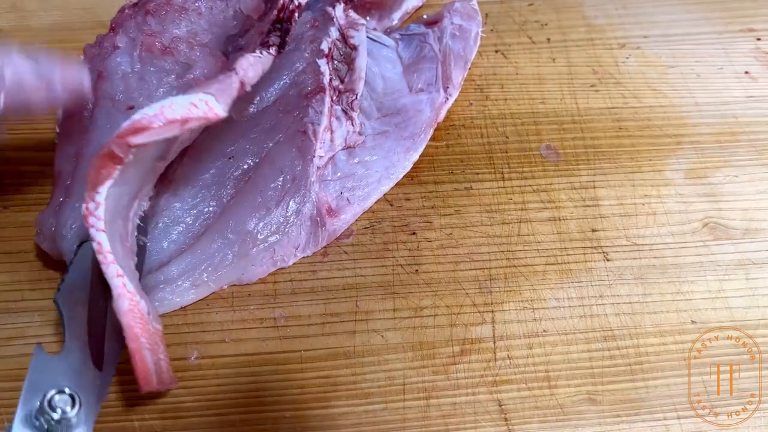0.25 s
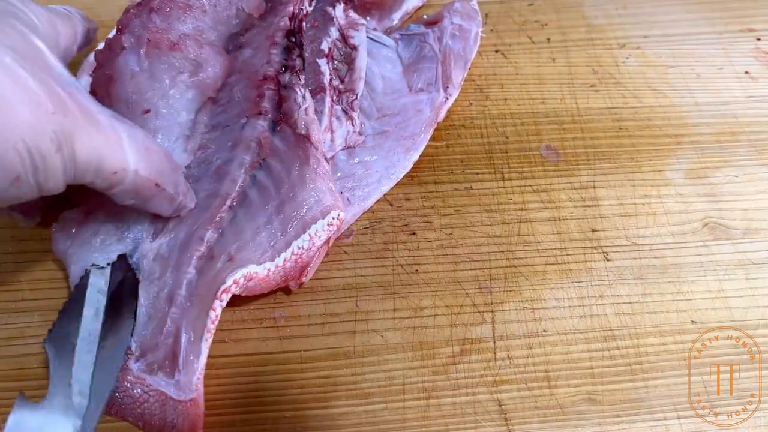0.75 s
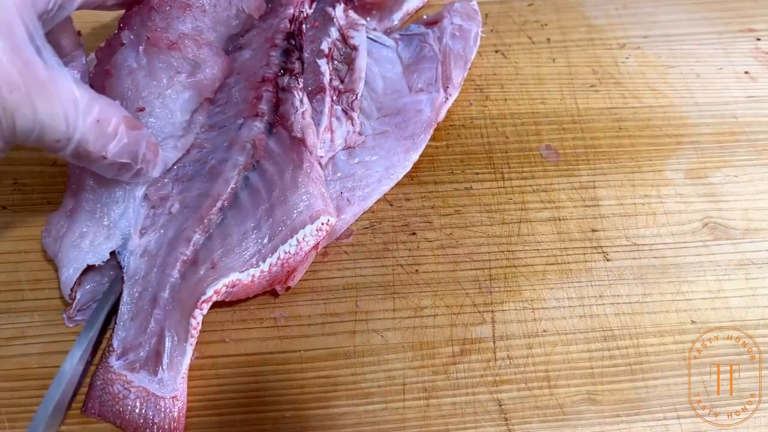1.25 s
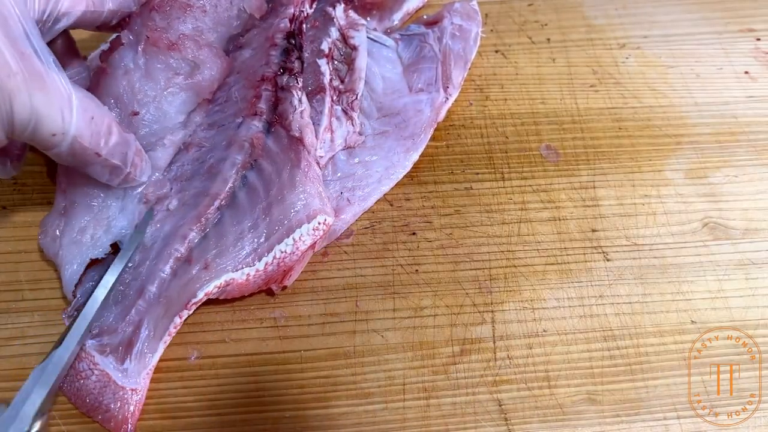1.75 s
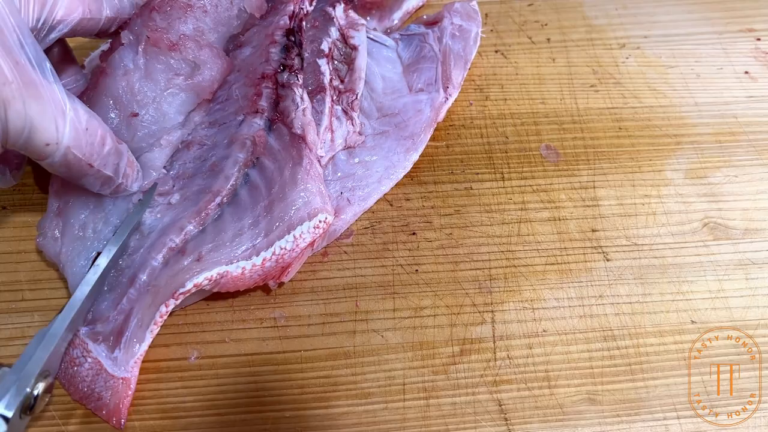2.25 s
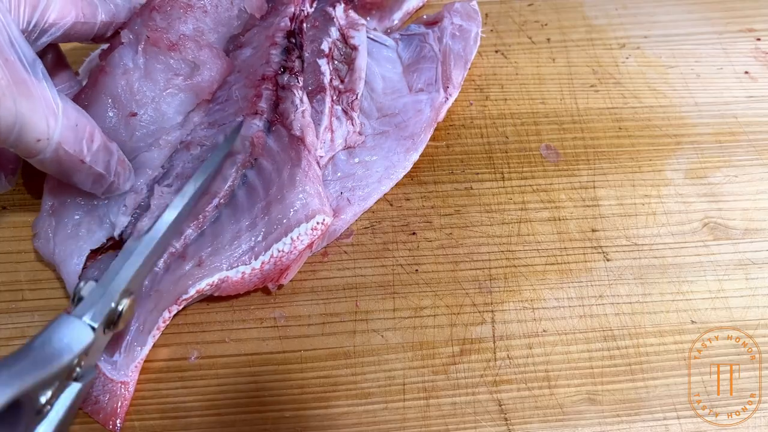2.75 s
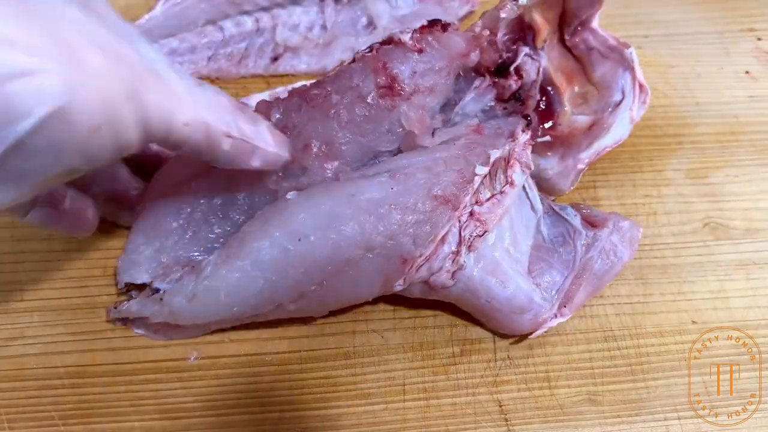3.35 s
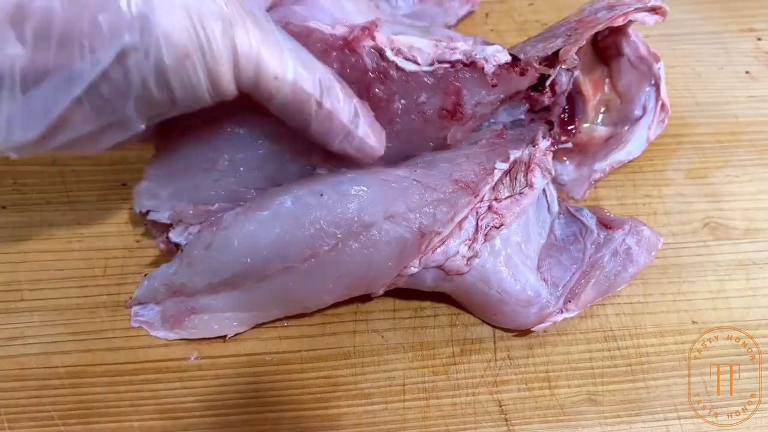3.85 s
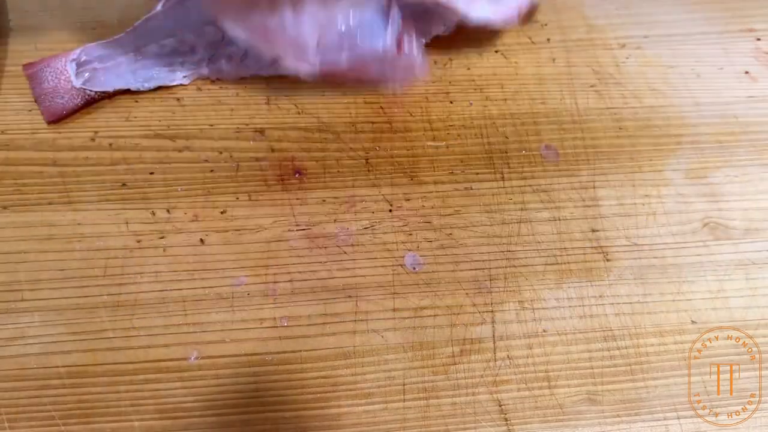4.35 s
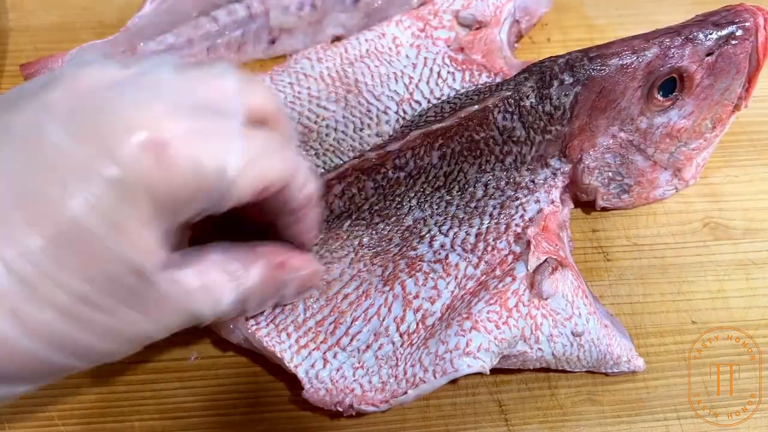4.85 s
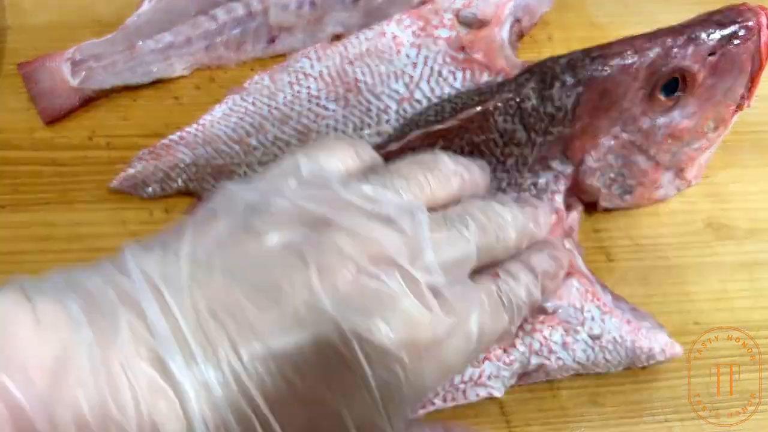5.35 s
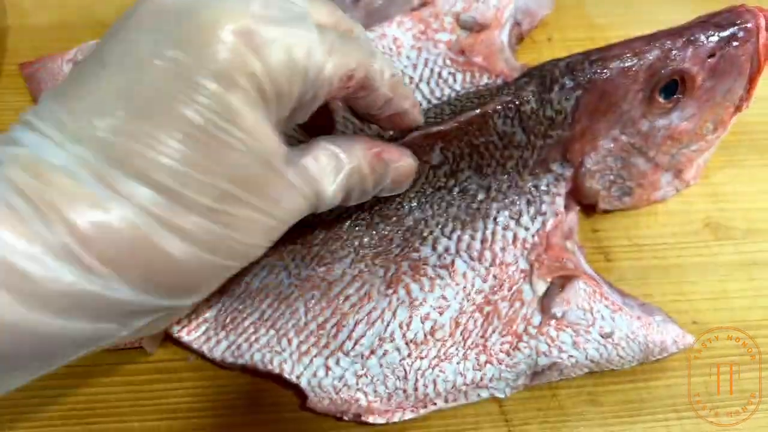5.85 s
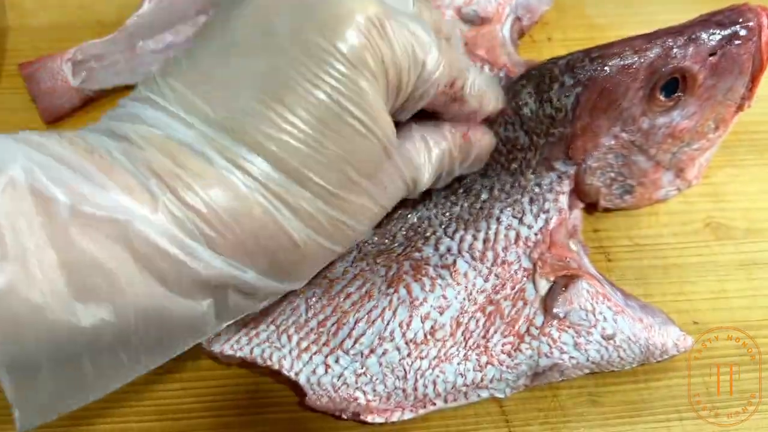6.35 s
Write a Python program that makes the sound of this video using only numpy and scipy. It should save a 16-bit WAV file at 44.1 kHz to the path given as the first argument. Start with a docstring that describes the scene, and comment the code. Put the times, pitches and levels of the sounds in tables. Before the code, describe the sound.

A wet fish flops onto a wooden board with a soft thump and a dull clink of shears. The blades rub, then snap twice through the backbone, each a sharp crack with a brief steel ring. Afterwards gloved hands peel up, turn and pat the fish, making quiet squelches, crinkles and sticky smacks. The sound is close, in a small kitchen with a faint low fan running throughout.

```python
"""Kitchen shears work along a fish on a wooden board and snap twice through its backbone.
The fish flops down, the blades rub, bone cracks and the steel rings into a small kitchen.
Then gloved hands peel the wet fish off the board, turn it and pat it: films tear, bubbles pop.
A fan rushes low throughout."""
import sys
import numpy as np
from scipy import signal
from scipy.io import wavfile
from scipy.ndimage import uniform_filter1d

SR = 44100
rng = np.random.default_rng(int(sys.argv[2]) if len(sys.argv) > 2 else 0)


def file_out(sig):
    """Save sig as 16-bit WAV at sys.argv[1]."""
    # one column per channel
    cols = np.atleast_2d(sig).T
    # limit, then scale
    lim = np.clip(cols, -1, 1)
    pcm = np.round(lim * 32767).astype(np.int16)
    wavfile.write(sys.argv[1], SR, pcm)


N = 291501

# wet skin and glove: (frequency [Hz], gain [dB])
WET_SPECTRUM = [(400, -9.5), (1000, -7.5), (2000, -5.5), (3500, 0.5), (4800, -2.5), (6700, 1), (8200, -2.5),
                (9700, -0.5), (11500, -9), (13700, -4), (15300, -6)]


def amp(db):
    return 10 ** (np.asarray(db) / 20)


def unit_rms(x):
    return x / np.sqrt(np.mean(x ** 2) + 1e-30)


def unit_energy(x):
    return x / np.sqrt(np.sum(x ** 2) + 1e-30)


def interp_log_hz(points, hz):
    knots_hz, values = np.transpose(points)
    return np.interp(np.log(hz + 1), np.log(knots_hz + 1), values)


def add(mix, start_s, sound):
    part = mix[max(round(start_s * SR), 0):][:len(sound)]
    part += sound[:len(part)]


def colour(x, spectrum, tilt_db_oct=0, size=4096):
    """Minimum-phase filter: the given spectrum, tilted about 1 kHz."""
    hz = abs(np.fft.fftfreq(size, 1 / SR))
    log_gain = np.log(amp(interp_log_hz(spectrum, hz) + tilt_db_oct * np.log2((hz + 20) / 1000)))
    taps = np.fft.ifft(np.exp(np.conj(signal.hilbert(log_gain)))).real
    return signal.oaconvolve(x, taps[:size // 2])[:len(x)]


def ring(x, hz, width_hz):
    """One damped mode driven by x; unit energy."""
    r = np.exp(-np.pi * width_hz / SR)
    return unit_energy(signal.lfilter([1, 0, -1], [1, -2 * r * np.cos(2 * np.pi * hz / SR), r * r], x))


def burst(length_s, rise=0.48, size=22050):
    """A run of tiny slips: noise that swells and dies; unit energy."""
    age = np.arange(size) / SR / length_s
    return unit_energy(rng.standard_normal(size) * age ** rise * np.exp(-2 * age))


def wander(samples):
    """Smooth random drift; unit RMS."""
    return unit_rms(uniform_filter1d(uniform_filter1d(rng.standard_normal(N), samples), samples))


def fan(level_db=-61.57, waver_rad=1.1):
    """Steady low rush with faint wavering tones."""
    # air rush: (frequency [Hz], gain [dB])
    spectrum = [(15, -59), (25, -8), (80, -3.5), (137, -4.5), (161, -6), (285, -2), (714, -12.5),
                (796, -12), (863, -11.5), (988, -14.5), (2550, -24), (3080, -27.5), (3920, -27.5),
                (4740, -35.5), (16000, -37)]
    # hum: (frequency [Hz], RMS level [dB])
    tones = [(92, -72), (208, -74.5), (285, -79), (412, -79.5), (4021, -91.5), (13598, -93.5)]
    out = amp(level_db) * unit_rms(colour(rng.standard_normal(N + 4096), spectrum)[-N:])
    for hz, db in tones:
        phase = 2 * np.pi * hz * np.arange(N) / SR + waver_rad * wander(6000)
        out += amp(db) * np.sqrt(2) * np.sin(phase)
    return out


def touch(start_s, hold_s, release_s, attack_s=0.0046):
    """Contact envelope: linear attack, hold, exponential release."""
    t = np.arange(N) / SR - start_s
    return np.clip(t / attack_s, 0, 1) * np.exp(-np.maximum(t - hold_s, 0) / release_s)


def pressure(treble=False, settling_db=-78.5):
    """Crackle envelope: presses over light handling and flesh settling by itself."""
    # (start [s], hold [s], level [dB], extra treble [dB]: high for glove creases, low for flesh)
    presses = [(0.0, 0.016, -57.5, 1), (0.198, 0.038, -55, -4), (.28, .025, -52, -1), (.45, 0.074, -66, 7),
               (.56, 0.14, -66.5, 9), (2.902, 0.024, -62.5, 1), (3.127, 0.033, -58, -3),
               (3.263, 0.025, -65, 6), (3.508, 0.1, -59, 3.5), (3.703, 0.11, -56, -2.5),
               (4.388, 0.016, -58.5, -8), (4.548, 0.25, -59.5, 0.5), (5.198, 0.19, -63.5, 6),
               (5.49, 0.19, -68, 7), (5.705, 0.023, -61, 2), (6.197, 0.013, -60, 0),
               (6.517, 0.043, -56, -8)]
    # hand on the fish: (start [s], hold [s], level [dB])
    holds = [(0.0, 0.76, -69), (2.876, 1.015, -64.5), (4.47, 1.41, -69), (6.03, .55, -71.5)]
    press_power = sum((amp(db + treble * treble_db) * touch(start_s, hold_s, release_s=0.033)) ** 2
                      for start_s, hold_s, db, treble_db in presses)
    hold_power = sum((amp(db) * touch(start_s, hold_s, release_s=0.16)) ** 2
                     for start_s, hold_s, db in holds)
    return np.sqrt(press_power + hold_power + amp(settling_db) ** 2)


def squelch(pops_per_s=3000, spread_db=0.5, clump_db=5.5, fizz_db=-6, gain_db=-3.5, split_hz=9500):
    """Tiny bubbles and glove creases pop in clumps under the hand."""
    t = np.arange(256) / SR
    pops = np.zeros(N)
    pitches_hz = np.linspace(1000, 15500, 16)
    for hz in pitches_hz:
        clumps = 2 * np.tanh(wander(700) / 2)
        sizes = amp(spread_db * np.minimum(rng.exponential(1, N), 3) + clump_db * clumps)
        clicks = sizes * rng.choice([-1, 1], N) * (rng.random(N) < pops_per_s / len(pitches_hz) / SR)
        grain = np.sin(2 * np.pi * hz * t) * np.exp(-hz * t / 2.5)
        pops += unit_rms(signal.oaconvolve(clicks, grain)[:N])
    wet = colour(unit_rms(pops) + amp(fizz_db) * rng.standard_normal(N), WET_SPECTRUM)
    body = signal.sosfiltfilt(signal.butter(2, split_hz, fs=SR, output="sos"), wet)
    return amp(gain_db) * (body * pressure() + (wet - body) * pressure(treble=True)) / wet.std()


def smack(hz, click_db, tear_s=0.0059, width_ratio=0.46, overtone_ratio=1.91, overtone_db=-7):
    """A wet film tears and rings two modes of the air pocket behind it."""
    tear = unit_energy(colour(burst(tear_s, rise=1.28, size=4096), WET_SPECTRUM, tilt_db_oct=-2))
    width_hz, upper_hz = hz * width_ratio, min(hz * overtone_ratio, 15000)
    lower = ring(ring(tear, hz, width_hz), hz, width_hz)
    upper = ring(ring(tear, upper_hz, width_hz), upper_hz, width_hz)
    return unit_energy(lower + amp(overtone_db) * upper + amp(click_db) * tear)


def smacks(gain_db=17):
    """Skin or glove pulls free with a distinct smack."""
    # (time [s], relative energy [dB], pocket resonance [Hz], click re pocket [dB])
    releases = [(.017, -45.5, 3900, 10), (0.072, -45.5, 3770, 7), (.206, -45, 2540, -5),
                (.471, -50.5, 3050, 17), (.563, -45.5, 8060, -3), (.772, -52.5, 6600, 8),
                (.983, -59, 6000, 12), (3.049, -46.5, 3980, -10), (3.129, -47, 6160, 7),
                (3.269, -43.5, 4800, -3), (3.446, -48, 3850, 13), (3.514, -44.5, 4300, 4),
                (3.614, -43, 2240, 11), (3.718, -42.5, 7170, 2), (4.39, -41, 3700, 4),
                (4.470, -50, 2850, -8), (4.491, -47, 5900, 12), (4.557, -46, 4580, 16),
                (4.603, -46.5, 5900, -12), (4.665, -42, 6060, 6), (4.761, -48, 6800, -8),
                (4.791, -44, 4900, 16), (4.92, -47, 4870, -35), (5.049, -47, 6300, 5),
                (5.245, -48.5, 7300, -21), (5.278, -47, 4450, -8), (5.357, -48, 10000, -8),
                (5.43, -48.5, 5130, 14), (5.587, -43.5, 6800, 18), (5.623, -44.5, 7300, -26),
                (5.802, -48.5, 6340, 21), (5.898, -46.5, 8750, 2), (6.091, -53, 7530, -14),
                (6.311, -54.5, 7310, 8), (6.519, -43.5, 6600, 0), (6.541, -49.5, 2740, -8)]
    out = np.zeros(N)
    for time_s, db, hz, click_db in releases:
        add(out, time_s, amp(db + gain_db) * smack(hz, click_db))
    return out


def crinkles(count=130, gain_db=24, spread_db=9, low_hz=3200, high_hz=9500):
    """Small glove and skin smacks at random times, scaled by pressure."""
    out = np.zeros(N)
    for when, weakness, pitch in rng.random((count, 3)):
        hz = low_hz * (high_hz / low_hz) ** pitch
        add(out, when * N / SR, amp(gain_db - spread_db * weakness) * smack(hz, click_db=-4))
    return out * pressure()


def drag(grains_per_s=1500, clump_db=2.5):
    """Fish or blades slide over wet flesh and wood: dull grains, a bell-shaped swell per slide."""
    # (time of top speed [s], length [s], level [dB])
    slides = [(0.298, 0.31, -70), (0.764, 0.31, -69.5), (1.456, 0.21, -71.5), (3.058, 0.96, -70),
              (3.682, 0.21, -61.5), (4.18, 0.12, -70), (4.571, 0.047, -61), (4.813, 0.24, -68.5),
              (5.354, 0.28, -70), (6.05, 0.31, -68), (6.56, 0.13, -75)]
    # wet friction: (frequency [Hz], gain [dB])
    spectrum = [(300, -24), (900, 2.5), (1300, 0.5), (1650, 4.5), (2000, -3.5), (2500, 2.5), (2900, -10.5),
                (4000, -6.5), (9000, -33.5)]
    t = np.arange(N) / SR
    power = sum(amp(db) ** 2 * np.exp(-(2 * (t - time_s) / length_s) ** 2)
                for time_s, length_s, db in slides)
    grains = rng.standard_normal(N) * (rng.random(N) < grains_per_s / SR) * amp(clump_db * wander(600))
    return np.sqrt(power) * unit_rms(colour(grains, spectrum))


def thumps(lowpass_hz=1500):
    """Soft flesh lands on the board and drives its modes."""
    # (frequency [Hz], level [dB], t60 [s])
    board_modes = [(59, -2.5, .16), (110.5, 3.5, .16), (209.3, 4.5, 0.17), (290, -4.5, 0.15),
                   (398, 8, 0.061), (534, 0, 0.046), (679, -5, 0.065), (740, -5.5, .09), (896, -13.5, 0.13),
                   (1340, -13, 0.13), (1662, -8.5, 0.096)]
    # (time [s], energy before low-pass [dB], contact [s], tilt [dB/oct])
    blows = [(0.278, -16.5, 0.036, 2), (0.305, -15, 0.016, 4), (0.318, -10.5, 0.0071, 1),
             (0.34, -27, 0.0048, -15), (1.938, -24, .012, -2.5), (2.232, -25.5, 0.017, 1.5),
             (2.425, -23, 0.017, -5.5), (2.458, -30.5, 0.017, -10.5), (2.626, -29.5, 0.016, 0)]
    out = np.zeros(N)
    for time_s, db, contact_s, tilt_db_oct in blows:
        wood = 0
        for hz, mode_db, t60_s in board_modes:
            width_hz = np.log(1000) / np.pi / t60_s
            wood += amp(mode_db + tilt_db_oct * np.log2(hz / 300)) * ring(burst(contact_s), hz, width_hz)
        add(out, time_s, amp(db) * unit_energy(wood))
    return signal.sosfilt(signal.butter(2, lowpass_hz, fs=SR, output="sos"), out)


def knocks(width_hz=60, contact_s=0.0055):
    """Shears hit the board: a short, dull clink."""
    # (time [s], energy [dB])
    hits = [(.281, -27), (0.2963, -16.5), (2.618, -25.5)]
    # steel on wood: (frequency [Hz], level [dB])
    modes = [(1350, -6.5), (1720, -12), (2450, -2.5), (2600, -3.5), (3280, -2), (3700, -1.5), (4150, -9),
             (4930, -6.5), (6300, -7.5), (7000, -8.5), (7650, -14.5)]
    out = np.zeros(N)
    for time_s, db in hits:
        clink = sum(amp(mode_db) * ring(burst(contact_s), hz, width_hz) for hz, mode_db in modes)
        add(out, time_s, amp(db) * unit_energy(clink))
    return out


def blade_rub(slips_per_s=3500, rasp_db=-3, chatter_db=1, range_db=21):
    """Edge-on-edge stick-slip rasps and rings the blades, louder as the grip tightens."""
    # (peak time [s], level [dB], rise over range_db [s], fall over range_db [s])
    squeezes = [(1.755, -67, 0.019, .035), (2.103, -51.5, 0.081, 0.037), (2.346, -43.5, 0.021, .006),
                (2.62, -48, 0.011, 0.031)]
    # rubbed blades: (frequency [Hz], width [Hz], level [dB])
    modes = [(3075, 170, 2.5), (3980, 410, -3.5), (5900, 560, -7.5), (6700, 1400, 1), (7940, 970, -11),
             (8800, 390, -5), (11400, 500, -14), (13380, 1600, -5.5), (15600, 700, -10.5)]
    t = np.arange(N) / SR
    grip = sum(amp(db - range_db * np.maximum((peak_s - t) / rise_s, (t - peak_s) / fall_s))
               for peak_s, db, rise_s, fall_s in squeezes)
    slips = rng.standard_normal(N) * (rng.random(N) < slips_per_s / SR) * amp(chatter_db * wander(150))
    song = sum(amp(db) * ring(ring(slips, hz, width_hz), hz, 3 * width_hz) for hz, width_hz, db in modes)
    return grip * unit_rms(song + amp(rasp_db) * unit_energy(slips))


def snips(clash_s=0.0025, clash_width_hz=170, tail_width_hz=12, tail_db=-21):
    """Bone cracks and the released blades clash; returns (cracks, rings)."""
    # (time [s], crack energy [dB], crack length [s], steel energy [dB], closure [0-1], tilt [dB/oct])
    bites = [(1.737, -36, 0.006, -55, 0, -5.5), (1.759, -31, 0.0056, -50, 0, -7),
             (2.349, -11.5, 0.0019, -9, 0.44, -0.5), (2.3512, -14, 0.0035, -9, 0.52, -4),
             (2.6157, -32, 0.0021, -22.5, 0, -10), (2.622, -19.5, .003, -23.5, 0.63, -3.5),
             (2.6533, -33, .005, -11.5, 0.9, 2), (2.6585, -5, 0.0037, -12, 0.85, -1),
             (2.6622, -8.5, 0.0033, 0, 0.97, 0)]
    # bone fracture: (frequency [Hz], gain [dB])
    crack_spectrum = [(250, -17.5), (600, -21), (1000, -1), (1800, -4), (2600, 2), (5000, 6.5),
                      (8500, -6.5), (12000, -11), (16000, 4.5)]
    # (frequency [Hz], level ajar [dB], level shut [dB])
    steel_modes = [(2367, -13, -12), (2820, -38, -48), (3523, 18, -25.5), (4060, 1.5, -15.5),
                   (4800, 4, -26.5), (4850, 9.5, -16.5), (5300, -13.5, -4), (5940, -22.5, -16),
                   (5910, 4, -6.5), (6330, 12.5, 1), (6350, -27.5, -3), (6350, 2, -0.5), (6640, -0.5, -1.5),
                   (7210, -5, 0.5), (7400, 13, -13.5), (7620, -2.5, 0.5), (8370, -24.5, -6.5),
                   (8800, 4, -30), (10400, 7, -26.5), (9450, -8, -2), (9950, -3, -1), (10840, -13, -14),
                   (11550, -36.5, -6), (12200, -16.5, -9), (12760, -28, -5.5), (14000, -32.5, -15),
                   (15500, -9.5, -13), (14700, -16, -7), (16100, -7.5, -14)]
    cracks, rings = np.zeros(N), np.zeros(N)
    for time_s, crack_db, crack_s, steel_db, closure, tilt_db_oct in bites:
        crack = colour(burst(crack_s), crack_spectrum, tilt_db_oct)
        add(cracks, time_s, amp(crack_db) * unit_energy(crack))
        steel = 0
        for hz, ajar_db, shut_db in steel_modes:
            mode_db = ajar_db + closure * (shut_db - ajar_db) + tilt_db_oct * np.log2(hz / 6000)
            # hand and flesh damp the clash; only strong modes ring on
            clash = ring(burst(clash_s), hz, clash_width_hz)
            tail = ring(burst(clash_s), hz, tail_width_hz * max(hz / 6000, 1))
            steel += amp(mode_db) * (clash + amp(tail_db + min(mode_db, 0)) * tail)
        add(rings, time_s, amp(steel_db) * unit_energy(steel))
    return cracks, rings


def kitchen(x, echoes_per_s=5000, gap_s=0.0025, size=32768):
    """Dense reflections off tiles and cupboards; each band decays at its own rate."""
    # (frequency [Hz], t60 [s])
    decay_times = [(100, 0.098), (500, 0.34), (2000, 0.23), (6500, 0.32), (10000, 0.25), (16000, 0.24)]
    taps = rng.choice([-1., 1.], size) * (rng.random(size) < echoes_per_s / SR)
    taps *= np.arange(size) / SR > gap_s
    hz, t, bands = signal.stft(taps, SR, nperseg=256)
    fade = amp(-60 * t / interp_log_hz(decay_times, hz)[:, None])
    response = signal.istft(bands * fade, SR, nperseg=256)[1]
    return signal.fftconvolve(x, unit_energy(response))[:N]


def scene():
    """Mono mix: shears, board and fish, direct and through the room, plus the fan."""
    cracks, rings = snips()
    rub = blade_rub()
    wood = thumps() + knocks()
    flesh = smacks() + crinkles() + squelch() + drag()
    room = kitchen(amp(-6) * (cracks + rub + wood) + amp(0.5) * rings + amp(-5.5) * flesh)
    return (cracks + rings + rub + wood + flesh + room + fan())[None]


def record(dry, low_cut_hz=40, port_hz=15450, port_width_hz=700, high_cut_hz=15880):
    """Microphone bass roll-off and port resonance, then a steep low-pass."""
    thin = signal.sosfilt(signal.butter(2, low_cut_hz, "highpass", fs=SR, output="sos"), dry)
    port = signal.lfilter(*signal.iirpeak(port_hz, port_hz / port_width_hz, fs=SR), thin)
    lowpass = signal.firwin(511, high_cut_hz, window=("kaiser", 9), fs=SR)
    return signal.oaconvolve(thin + port, lowpass[None], "same")


dry = scene()
out = record(dry)
file_out(out)
```